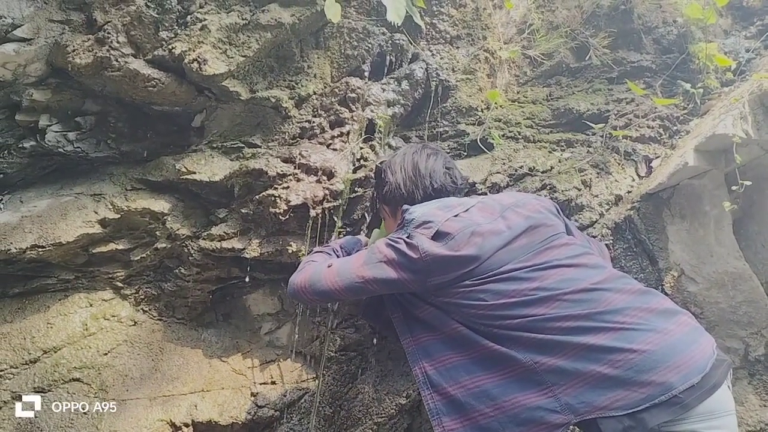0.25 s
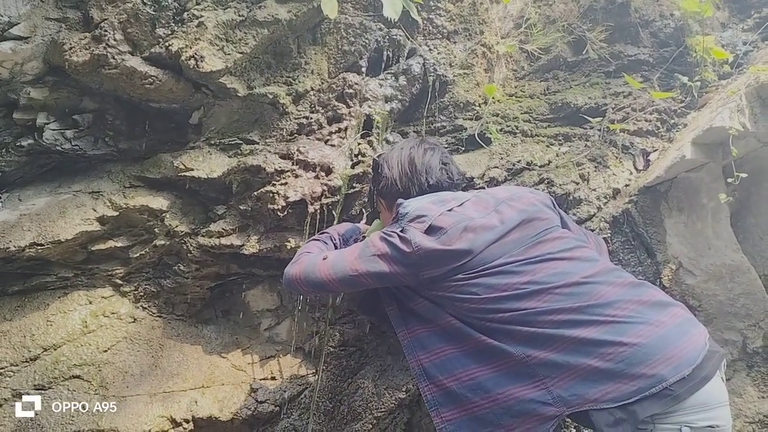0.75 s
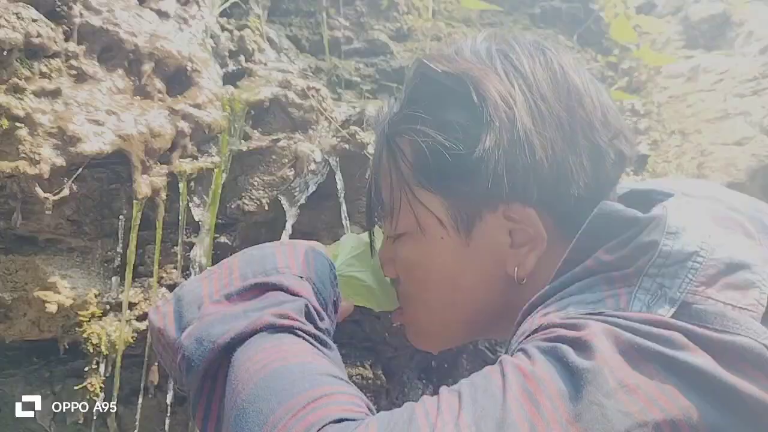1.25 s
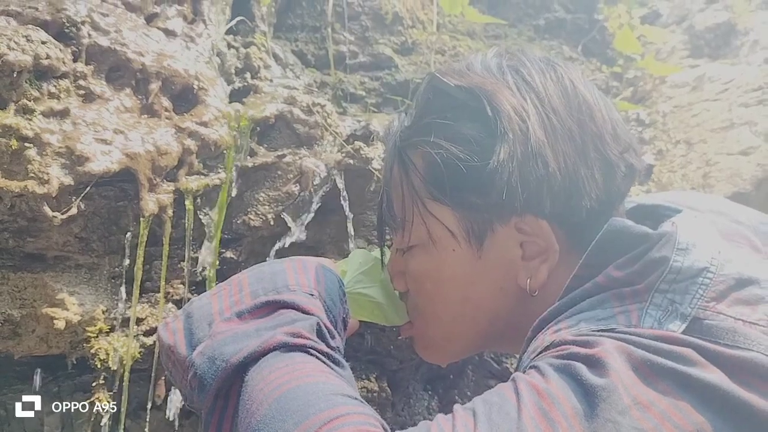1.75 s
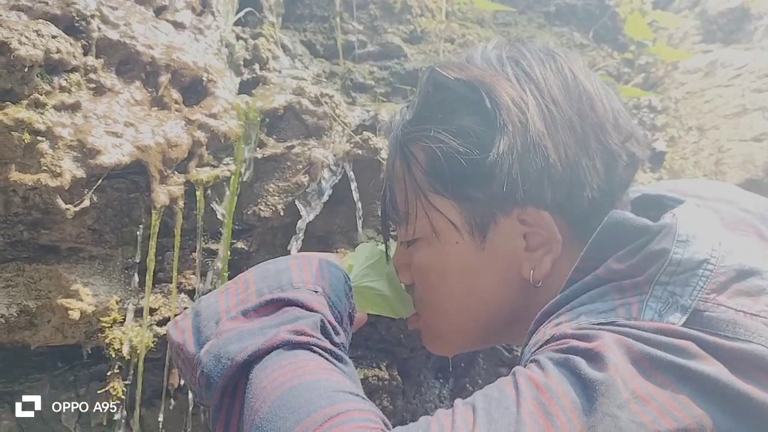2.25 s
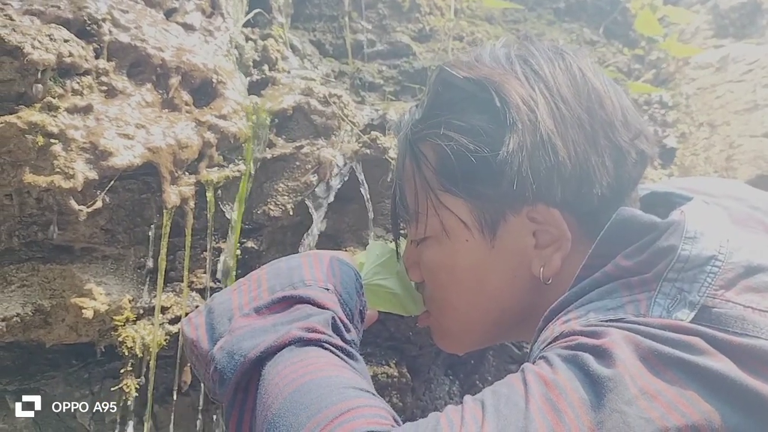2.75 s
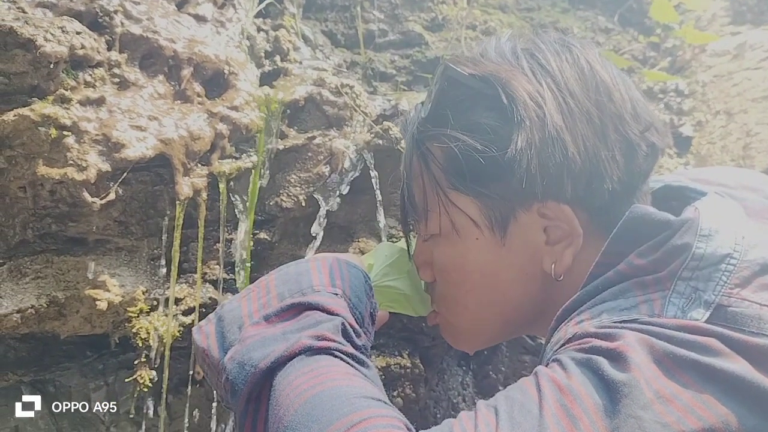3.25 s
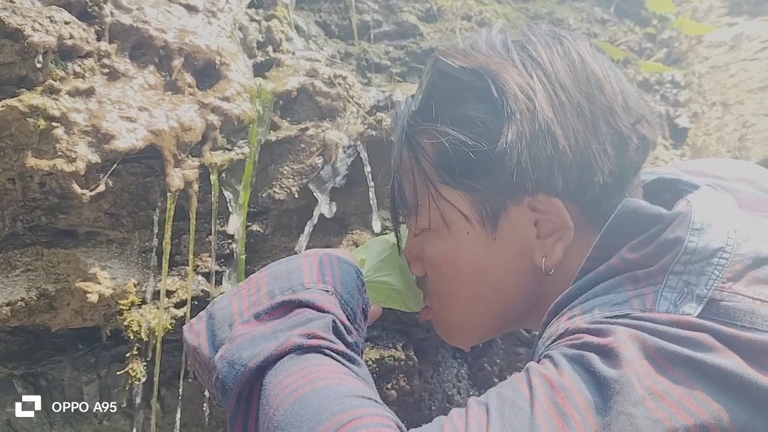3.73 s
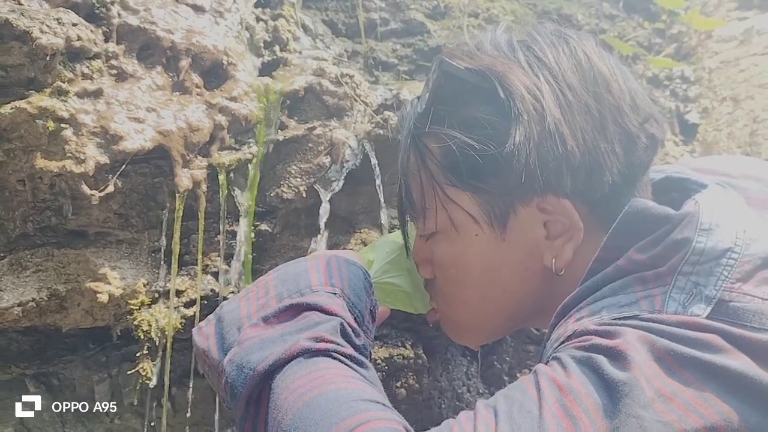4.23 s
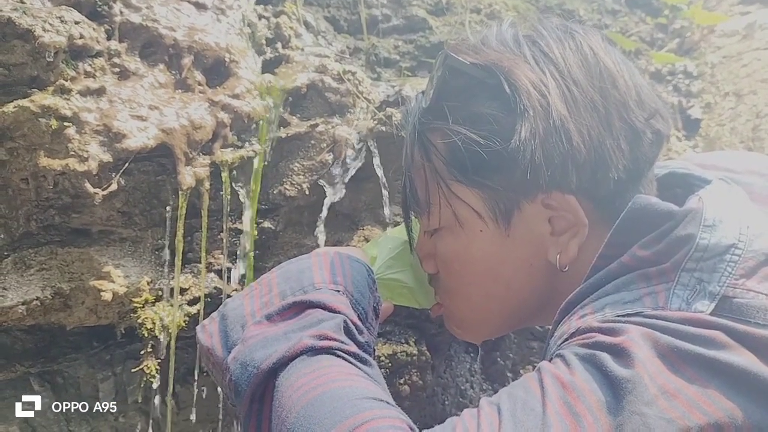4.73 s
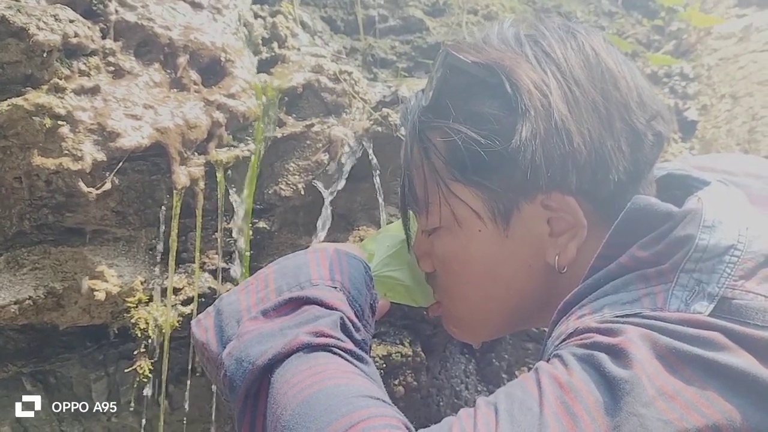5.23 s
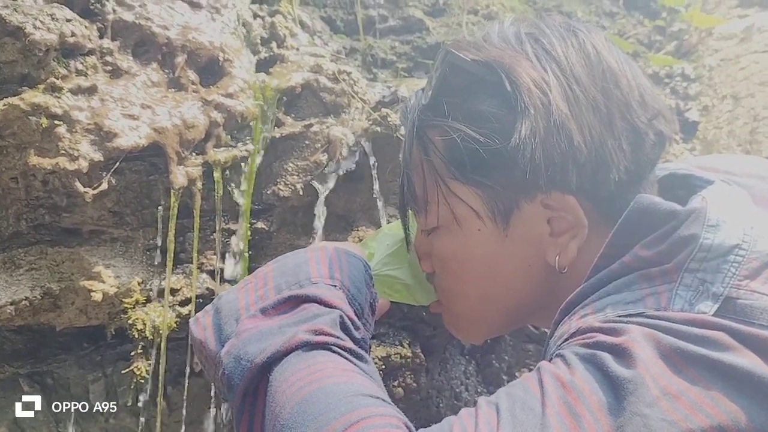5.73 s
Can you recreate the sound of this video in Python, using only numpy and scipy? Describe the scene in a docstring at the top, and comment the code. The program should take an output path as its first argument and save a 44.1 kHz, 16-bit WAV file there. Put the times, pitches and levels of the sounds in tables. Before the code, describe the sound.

From 0 to about 1.2 s, spring water trickles down rock a few steps away: an even, bright patter over soft gurgling and fine hissing spray, with few separate drops standing out. It dips quickly and stops at 1.3 s. Silence follows until about 1.8 s. Then the water cuts in abruptly from close to the rock, strongest at first, with a flurry of sharp smacks and a dull knock until about 2.0 s. More hard drops hit near 2.2 and 2.35 s. The trickle settles into steady patter and gurgle with crackly spray and a rapid, loose scatter of tiny drips. Clear drops tick around 2.9 to 3.3 s, thin out, then snap again at 4.05, 4.15 and 4.4 s. Faint hollow bumps appear occasionally. Lower, plipping drops fall near 5.6 and 5.8 s, and the trickle continues to the end at about 6 s.

```python
"""Spring water trickles down a rock face in a ravine: gurgling bubbles, bright patter and fine spray.
Bubbles are ringing resonances struck by random clicks; spray is short puffs of noise, all over a steady wash.
The sound fades out, pauses, and comes back from closer to the rock.
There, drops smack down as noise bursts ringing at two pitches, and a few dull bumps are decaying tones."""
import sys
import numpy as np
from scipy import signal
from scipy.fft import rfft, irfft, next_fast_len
from scipy.io import wavfile
from scipy.ndimage import uniform_filter1d

SR = 44100
rng = np.random.default_rng(int(sys.argv[2]) if len(sys.argv) > 2 else 0)


def to_wav(s):
    """Save 16-bit WAV."""
    ch = np.atleast_2d(s).T  # columns
    pcm = np.round(np.clip(ch, -1, 1) * 32767)  # PCM
    wavfile.write(sys.argv[1], SR, pcm.astype(np.int16))


N = 263718
TIME = np.arange(N) / SR
RETURN_S = 1.819  # the close sound begins

# tone colour of the fine spray, far and near: (pitch_hz [Hz], level_db [relative dB per Hz])
SPRAY_COLOUR = [(4000, -31), (4800, -2), (5400, -2.5), (5850, -0.5), (6400, -3), (7000, -1), (8000, -12),
                (9500, -26), (11000, -25), (11950, -14.5), (12600, -19), (13500, -16.5), (14300, -20.5),
                (15700, -21)]


def from_db(db):
    """Turn decibels into a gain."""
    return 10 ** (np.asarray(db) / 20)


def rms_one(x):
    """Scale to an rms (average strength) of 1."""
    return x / np.sqrt(np.mean(x ** 2) + 1e-20)


def drift(rate_hz):
    """Slow random wandering with an rms of 1: smoothed noise, made at every 40th sample."""
    step = 40
    r = np.exp(-2 * np.pi * rate_hz * step / SR)
    noise = rng.standard_normal(N // step + 2002)
    slow = signal.lfilter([1], [1, -2 * r, r * r], noise)[2000:]  # drop the filter's start-up
    return np.interp(np.arange(N) / step, np.arange(len(slow)), rms_one(slow))


def coloured(x, spectrum):
    """Filter that follows a table of (Hz, dB) and never sounds ahead of its input (minimum phase)."""
    size = 2 * next_fast_len(len(x) // 2 + 2048)
    pitch_hz, level_db = np.transpose(spectrum)
    bins_hz = np.maximum(np.arange(size // 2 + 1) * SR / size, 1)
    gain = from_db(np.interp(np.log(bins_hz), np.log(pitch_hz), level_db))
    # folding the cepstrum forward in time gives the minimum phase
    cepstrum = irfft(np.log(gain))
    cepstrum[1:size // 2] *= 2
    cepstrum[size // 2 + 1:] = 0
    return irfft(rfft(x, size) * np.exp(rfft(cepstrum)))[:len(x)]


def resonance(x, hz, width_hz):
    """Ring at one pitch, with a gain of about 1 at the peak; a narrower width rings longer."""
    r = np.exp(-np.pi * width_hz / SR)
    feed_in = np.array([1, 0, -1]) * (1 - r * r) / 2
    feed_back = [1, -2 * r * np.cos(2 * np.pi * hz / SR), r * r]
    return signal.lfilter(feed_in, feed_back, x + 1e-18)


def impacts(per_s, spread_db):
    """Clicks at random moments: many small ones, a few large."""
    sizes = from_db(spread_db * np.minimum(rng.exponential(1, N), 4))
    return (rng.random(N) < per_s / SR) * sizes * rng.choice([-1, 1], N)


def bubbles(per_s, spread_db, low_hz, high_hz, sharpness, count):
    """Trapped air pockets of many sizes, each struck by its share of the clicks and ringing briefly; rms 1."""
    clicks = impacts(per_s, spread_db)
    pocket = rng.integers(0, count, N)
    total = np.zeros(N)
    for k, hz in enumerate(np.linspace(low_hz, high_hz, count)):
        total += rms_one(resonance(clicks * (pocket == k), hz, hz / sharpness))
    return rms_one(total)


def splashes(per_s, spread_db, decay_s):
    """Each droplet bursts into a short, dying puff of noise; rms 1."""
    hits = impacts(per_s, spread_db) ** 2 + 1e-12
    energy = signal.lfilter([1], [1, -np.exp(-2 / (decay_s * SR))], hits)
    return rms_one(np.sqrt(energy) * rng.standard_normal(N))


def over_wash(grains, wash_db, flicker_db):
    """Distinct grains over the smooth wash of countless distant ones, a gently flickering noise; rms 1."""
    wash = from_db(wash_db + flicker_db * drift(25)) * rng.standard_normal(N)
    return rms_one(grains + wash)


def trickle(levels_db, layers):
    """Water is a mix of gurgle, patter and spray: colour each layer and set its level."""
    total = np.zeros(N)
    for level_db, (grains, colour) in zip(levels_db, layers):
        total += from_db(level_db) * rms_one(coloured(grains, colour))
    return total


def far_trickle():
    """From a few steps away the droplets merge into an even, bright patter."""
    # tone colours: (pitch_hz [Hz], level_db [relative dB per Hz])
    gurgle_colour = [(21, -67), (35, -44.5), (70, -24.5), (97, -12.5), (191, 0), (239, -2), (339, -1.5),
                     (376, -8), (463, -0.5), (632, -5.5), (701, -2.5), (1820, -4), (2200, -14.5),
                     (2860, -29.5), (4840, -120)]
    patter_colour = [(1120, -42), (1900, -12.5), (2860, -2.5), (3350, -7.5), (3780, -6), (4500, -15),
                     (5000, -11), (6500, -52.5), (11000, -120)]
    # steady levels before the fade: (gurgle_db, patter_db, spray_db) [dB]
    levels_db = (-43.5, -36, -44.5)
    gurgle = over_wash(bubbles(500, 2, 200, 2000, sharpness=22, count=36), wash_db=15, flicker_db=0.5)
    patter = over_wash(bubbles(1100, 2, 2200, 4600, sharpness=55, count=36), wash_db=9.5, flicker_db=0.7)
    ticks = rms_one(resonance(splashes(120, 0.9, 0.004), 5600, 1800))
    droplets = splashes(320, 2.6, 0.002) + from_db(-0.5) * ticks
    spray = over_wash(droplets, wash_db=9, flicker_db=0.2)
    return trickle(levels_db, [(gurgle, gurgle_colour), (patter, patter_colour), (spray, SPRAY_COLOUR)])


def level_raises():
    """The level of the close trickle is raised briefly: extra dB of each layer that rise, hold and fall."""
    # brief raises in level: (start_s of the hold [s], hold_s [s], gurgle_and_patter_db [dB], spray_db [dB])
    raises = [(1.826, 0.172, 6, 6), (2.323, 0.027, 4.5, -1)]
    rise_s, fall_s = 0.043, 0.023  # time constants
    body = spray = 0
    for start_s, hold_s, body_db, spray_db in raises:
        before = np.maximum(start_s - TIME, 0)
        after = np.maximum(TIME - start_s - hold_s, 0)
        shape = np.exp(-before / rise_s - after / fall_s)
        body = body + body_db * shape
        spray = spray + spray_db * shape
    return np.array([body, body, spray])  # gurgle, patter, spray


def near_trickle():
    """Close to the rock the fine spray breaks up into separate ticks."""
    # tone colours: (pitch_hz [Hz], level_db [relative dB per Hz])
    gurgle_colour = [(21, -50), (35, -39), (51, -25.5), (118, -8), (198, -10), (248, -1), (403, -9),
                     (479, -3), (590, -8.5), (654, -6), (834, -6.5), (1220, -4), (1610, -7.5),
                     (1980, -10.5), (2200, -9), (2860, -22.5), (4840, -120)]
    patter_colour = [(1120, -38), (1900, -9), (2300, -3.5), (2540, 1), (2990, -3.5), (3300, -3.5),
                     (4370, -9), (5000, -23), (6500, -32), (11000, -120)]
    # levels before the brief raises in level are added: (gurgle_db, patter_db, spray_db) [dB]
    levels_db = (-44, -41, -46)
    gurgle = over_wash(bubbles(400, 1.9, 219.4, 1917, sharpness=30, count=36), wash_db=13, flicker_db=0.65)
    patter = over_wash(bubbles(1000, 2.8, 2220, 4587, sharpness=59, count=36), wash_db=12.5, flicker_db=0.54)
    ticks = rms_one(resonance(splashes(50, 4.1, 0.0066), 5950, 2100))
    # the finest droplets crackle at the very top
    mist = rms_one(resonance(splashes(35, 1.6, 0.0027), 12900, 3000))
    droplets = ticks + from_db(2) * mist + from_db(-1) * splashes(130, 2.1, 0.0021)
    spray = over_wash(droplets, wash_db=10, flicker_db=1.5)
    layers = [(gurgle, gurgle_colour), (patter, patter_colour), (spray, SPRAY_COLOUR)]
    return trickle(np.array(levels_db)[:, None] + level_raises(), layers)


def small_drops():
    """Faint drips of much the same size fall at loose intervals: (s, tick dB, tick Hz, plip dB, plip Hz)."""
    gap_s, jitter_s = 0.055, 0.025
    spread_db, spread_octaves = 2, 0.14
    beats = np.arange(RETURN_S, TIME[-1], gap_s)
    when, tick, high, plip, low = rng.standard_normal((5, len(beats)))
    start_s = np.clip(beats + jitter_s * when, 0, TIME[-1])
    tick_db = -27.5 + spread_db * tick
    tick_hz = 6000 * 2 ** (spread_octaves * high)
    plip_db = -41 + spread_db * plip
    plip_hz = 3150 * 2 ** (spread_octaves * low)
    return np.transpose([start_s, tick_db, tick_hz, plip_db, plip_hz])


def splash_ring(burst, colour, hz, body_width_hz, ring_width_hz, ring_db):
    """A burst of spray rings a pocket of trapped air: a broad body with a narrow top; its energy is kept."""
    body = resonance(coloured(burst, colour), hz, body_width_hz)
    sound = body + from_db(ring_db) * resonance(body, hz, ring_width_hz)
    return sound * np.sqrt(np.sum(burst ** 2) / np.sum(sound ** 2))


def drops(rows):
    """A drop cracks on wet stone: its ragged splash rings a small and a large bubble, then scatters from the rock."""
    # colours of the high tick and the lower plip: (pitch_hz [Hz], level_db [relative dB per Hz])
    tick_colour = [(60, -61), (2000, -28), (3600, -6), (4400, -5), (5000, 2), (6000, 4.5), (7100, 0.5),
                   (8200, -10.5), (9700, -24.5), (12000, -8.5), (15700, -17)]
    plip_colour = [(60, -52), (300, -30), (1500, -15), (2100, -0.5), (2550, -1), (3600, 0), (4400, 3),
                   (5200, -6), (7000, -9), (9500, -44), (15700, -35)]
    rise_s, crack_s, tail_s = 0.00031, 0.00098, 0.047  # time constants
    size = 4096  # samples per drop
    out = np.zeros(N + size)
    t = np.arange(size) / SR
    rise = 1 - np.exp(-t / rise_s)
    crack_and_scatter = from_db(-1) * np.exp(-t / crack_s) + from_db(-20) * np.exp(-t / tail_s)
    for start_s, tick_db, tick_hz, plip_db, plip_hz in rows:
        tick_noise, plip_noise, lumps = rng.standard_normal((3, size))
        lumps = rms_one(uniform_filter1d(lumps, size=64))
        ragged = rise * rms_one(from_db(3 * np.tanh(lumps)))
        # a louder drop splashes for longer: twice as long for every 30 dB
        splash_s = 0.0042 * 2 ** ((max(tick_db, plip_db) + 23.5) / 30)
        tick_burst = tick_noise * ragged * (np.exp(-t / splash_s) + crack_and_scatter)
        tick = splash_ring(tick_burst, tick_colour, tick_hz, 4300, 340, ring_db=8.5)
        # the larger bubble lasts a little longer
        plip_burst = plip_noise * ragged * (np.exp(-t / (1.56 * splash_s)) + crack_and_scatter)
        plip = splash_ring(plip_burst, plip_colour, plip_hz, 2100, 140, ring_db=5.5)
        at = int(start_s * SR)
        out[at:at + size] += from_db(tick_db - 9.5) * tick + from_db(plip_db) * plip
    return out[:N]


def hollow(x):
    """The wet hollow colours all drops alike: they are heard directly and through its short rings."""
    # rings of the hollow: (pitch_hz [Hz], width_hz [Hz], level_db [dB relative to the direct sound])
    rings = [(2530, 170, -0.5), (2950, 140, -3), (3620, 160, -0.5), (4330, 250, -4.5), (5890, 230, -6.5)]
    total = x
    for pitch_hz, width_hz, level_db in rings:
        total = total + from_db(level_db) * resonance(x, pitch_hz, width_hz)
    return from_db(-3) * total


def bumps():
    """Soft dull knocks: a damped tone, made slightly rough by noise ringing around the same pitch."""
    # dull bumps and gulps of water:
    # (start_s [s], level_db [dB before the rise and decay], pitch_hz [Hz], decay_s [s])
    knocks = [(1.865, -22, 232, 0.0093), (1.873, -17.5, 1320, 0.003), (2.145, -34, 1047, 0.014),
              (2.315, -27, 1336, 0.0087), (2.466, -36, 877, 0.012), (2.978, -31, 1300, .007),
              (3.513, -32, 1230, .008), (4.219, -27.5, 1340, 0.0038), (5.159, -31.5, 286, 0.011),
              (5.505, -35.5, 1050, 0.013)]
    out = np.zeros(N)
    for start_s, level_db, pitch_hz, decay_s in knocks:
        t = np.maximum(TIME - start_s, 0)
        roughness = rms_one(resonance(rng.standard_normal(N), pitch_hz, pitch_hz / 4))
        tone = np.sin(2 * np.pi * pitch_hz * t) + 0.49 * roughness
        rise = 1 - np.exp(-t / (0.38 * decay_s))
        out += from_db(level_db) * rise * np.exp(-t / decay_s) * tone
    # remove the rumble below 150 Hz
    return signal.sosfilt(signal.butter(6, 150, "high", fs=SR, output="sos"), out + 1e-12)


def scene():
    """The far trickle fades by 21 dB and stops; after a pause the near trickle, drops and bumps cut in."""
    # loudest near drops, each with a high tick and a lower plip:
    # (start_s [s], tick_db [relative dB], tick_hz [Hz], plip_db [relative dB], plip_hz [Hz])
    loud_drops = [(1.8375, -20.5, 4330, -20.5, 3520), (1.8775, -13.5, 4830, -29, 3800),
                  (1.9288, -19, 6200, -37, 2760), (1.9828, -18.5, 5860, -42, 2820),
                  (2.044, -24, 5860, -38, 2740), (2.2, -14.5, 4330, -21.5, 3150),
                  (2.354, -14, 4760, -30, 3210), (2.4105, -20.5, 5850, -42, 3100),
                  (2.4628, -21, 7240, -42, 2800), (2.7337, -26, 4400, -35, 3560),
                  (2.792, -23, 5930, -34.5, 2770), (2.8902, -20, 4400, -20.5, 3590),
                  (2.8988, -24, 5000, -22.5, 3640), (3.0544, -22.5, 6230, -29.5, 3500),
                  (3.0654, -24, 4330, -33.5, 2850), (3.134, -27, 6820, -29, 3260),
                  (3.216, -26, 4380, -36, 3550), (3.272, -23, 4280, -27, 3300),
                  (4.061, -18.5, 5170, -33, 3830), (4.1687, -14, 5650, -30.5, 3100),
                  (4.4104, -19, 6200, -37, 3550), (4.5453, -22.5, 6200, -42, 2990),
                  (4.7192, -22.5, 5900, -48, 3540), (5.1646, -33, 4120, -30, 3100),
                  (5.2565, -23, 6250, -32, 2700), (5.3093, -21, 5250, -37, 3570),
                  (5.3876, -25, 5780, -34, 2670), (5.6158, -18, 3600, -23, 2700),
                  (5.7893, -20.5, 4150, -19.5, 2715), (5.9267, -22, 5900, -32, 3200)]
    fade_start_s, fade_end_s = 1.195, 1.303
    fade = np.clip((fade_end_s - TIME) / (fade_end_s - fade_start_s), 0, 1)
    far = far_trickle() * from_db(-21 * (1 - fade)) * (TIME < fade_end_s)
    near = near_trickle() + hollow(drops([*loud_drops, *small_drops()])) + bumps()
    cut_in = np.clip((TIME - RETURN_S) / 0.002, 0, 1)
    return (far + near * cut_in)[None]


def record(dry):
    """A steep low-pass filter removes the treble above 15750 Hz."""
    return signal.sosfilt(signal.ellip(12, 0.1, 80, 15750, fs=SR, output="sos"), dry)


dry = scene()
out = record(dry)
to_wav(out)
```